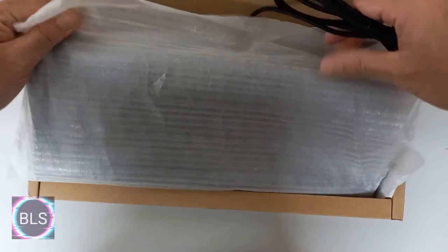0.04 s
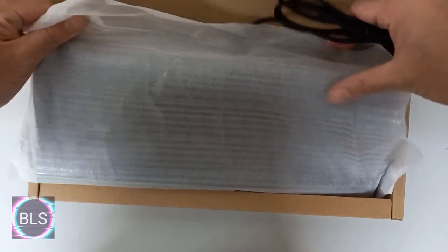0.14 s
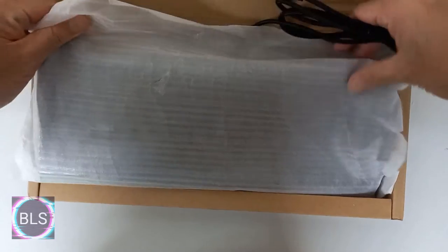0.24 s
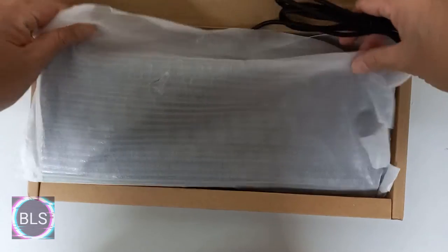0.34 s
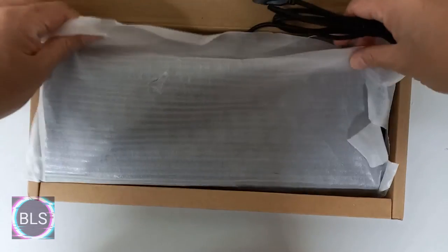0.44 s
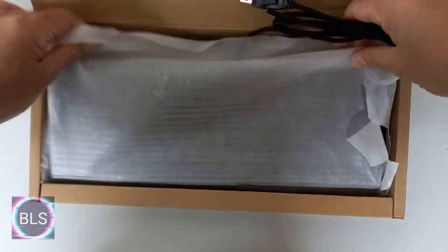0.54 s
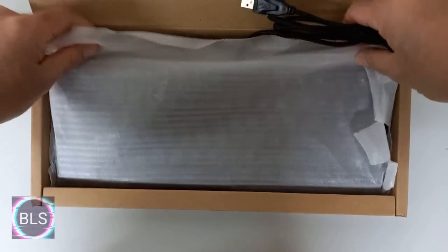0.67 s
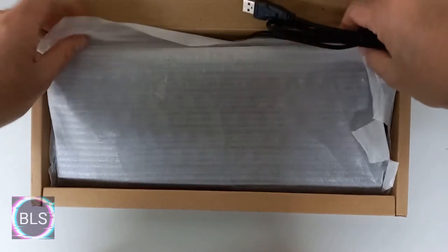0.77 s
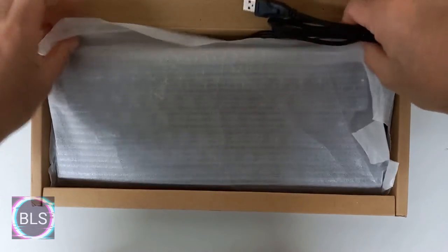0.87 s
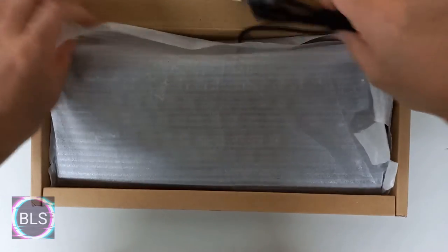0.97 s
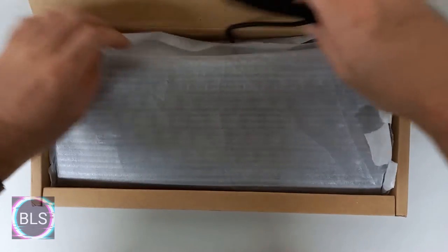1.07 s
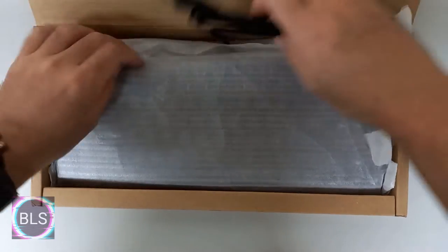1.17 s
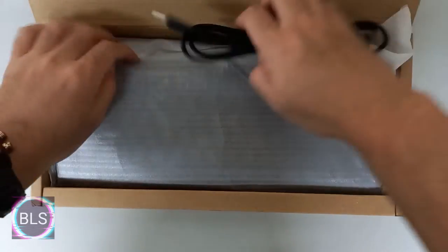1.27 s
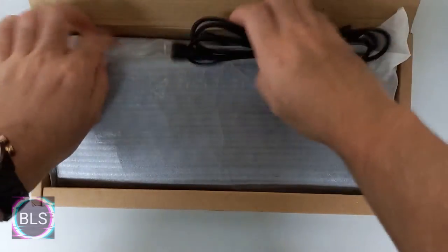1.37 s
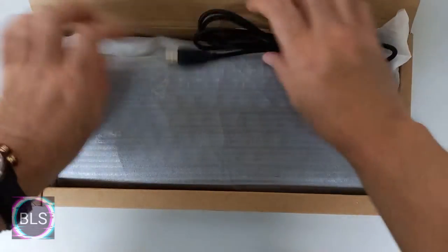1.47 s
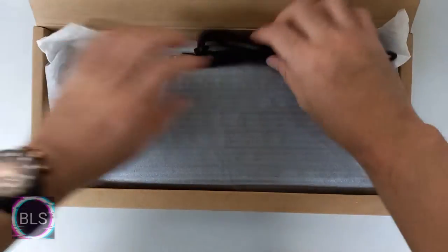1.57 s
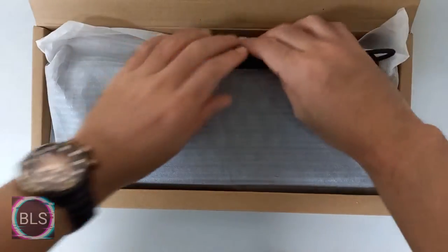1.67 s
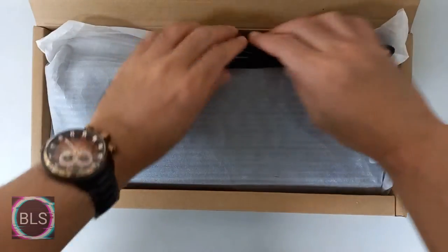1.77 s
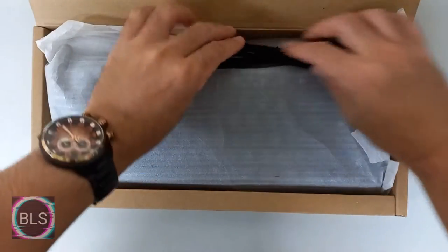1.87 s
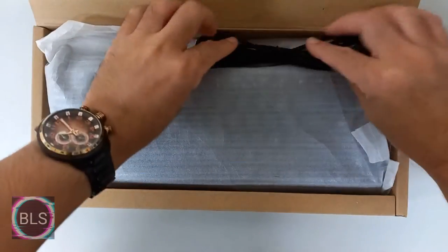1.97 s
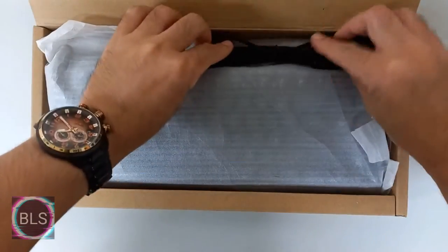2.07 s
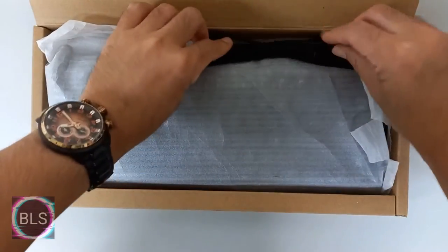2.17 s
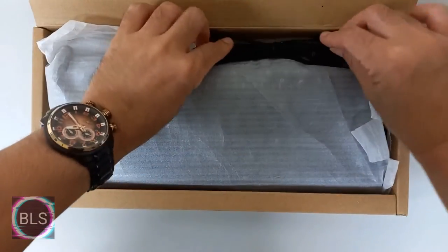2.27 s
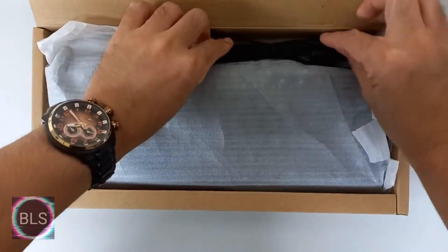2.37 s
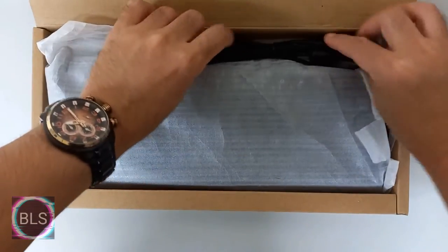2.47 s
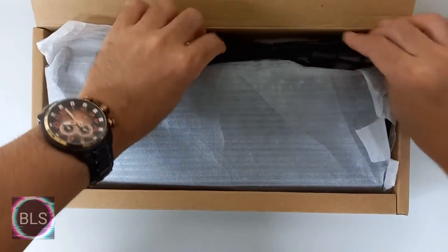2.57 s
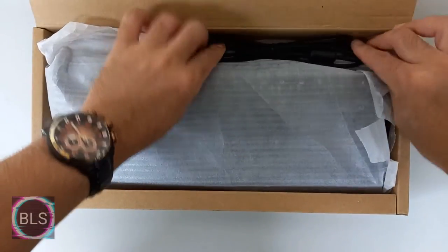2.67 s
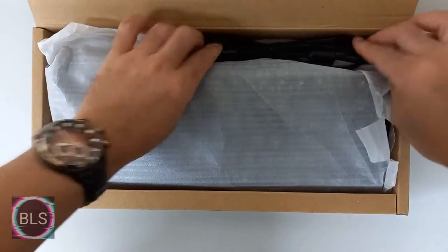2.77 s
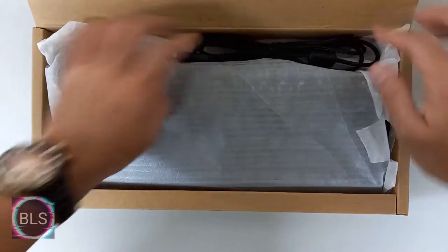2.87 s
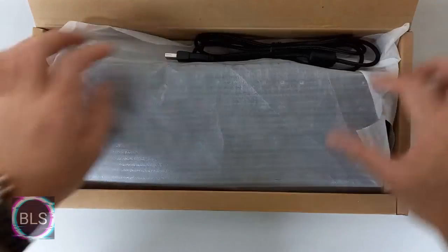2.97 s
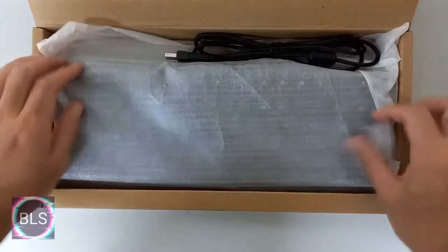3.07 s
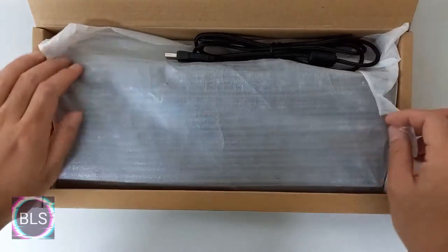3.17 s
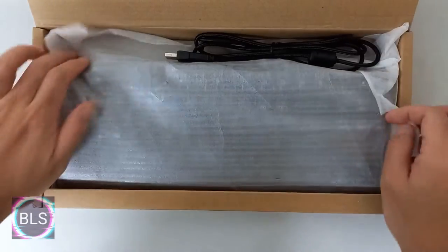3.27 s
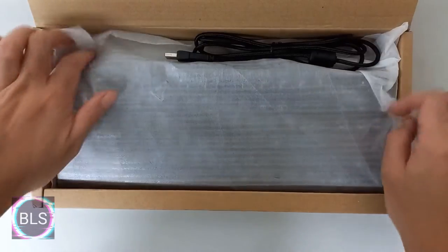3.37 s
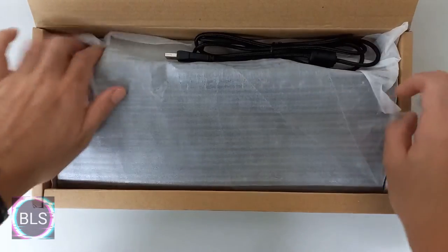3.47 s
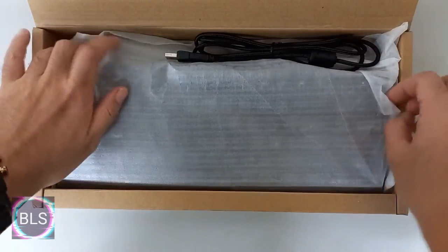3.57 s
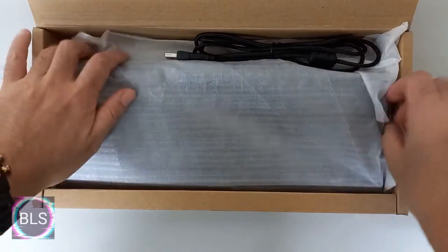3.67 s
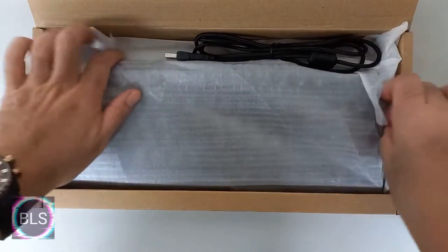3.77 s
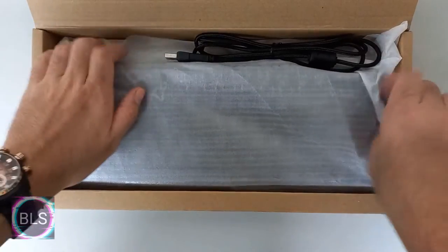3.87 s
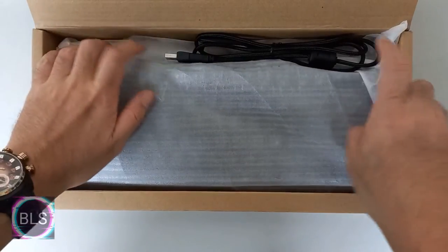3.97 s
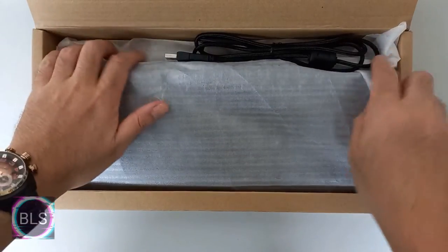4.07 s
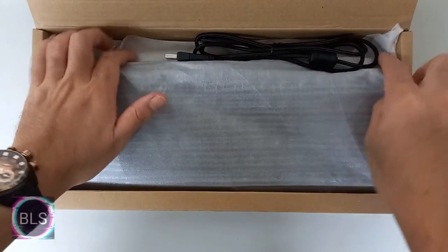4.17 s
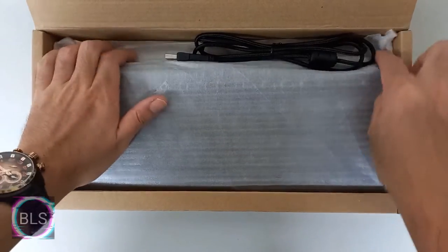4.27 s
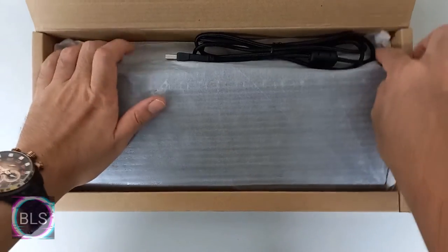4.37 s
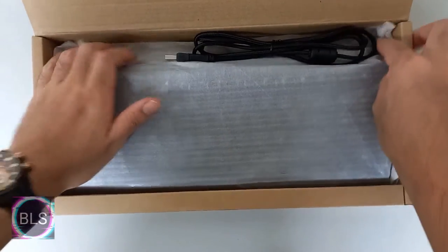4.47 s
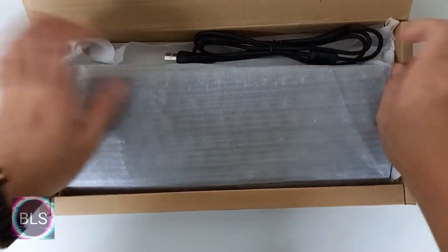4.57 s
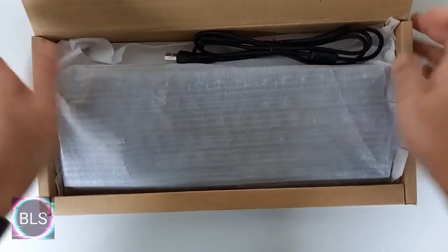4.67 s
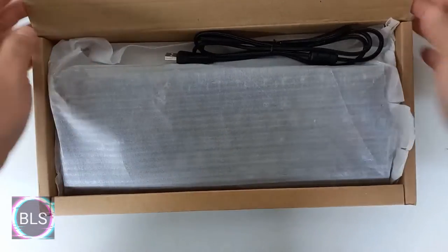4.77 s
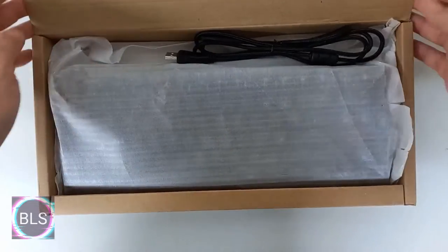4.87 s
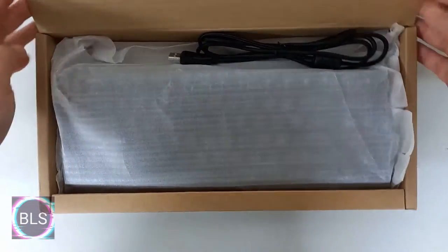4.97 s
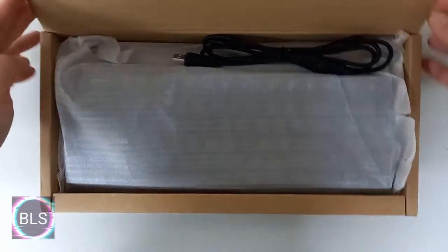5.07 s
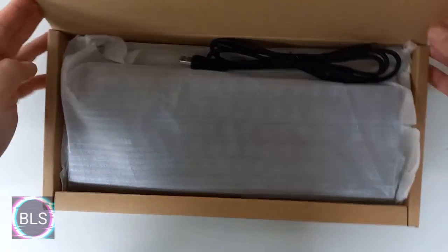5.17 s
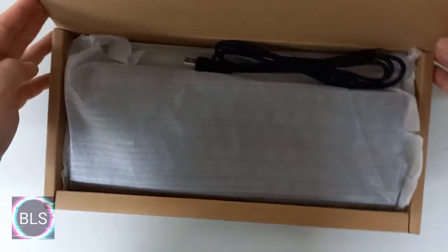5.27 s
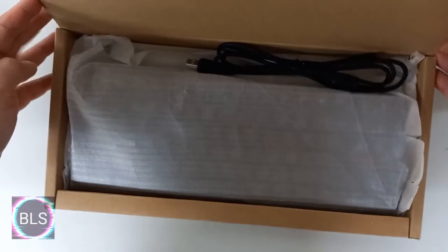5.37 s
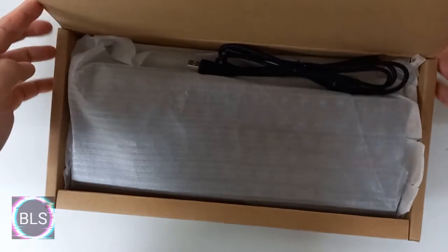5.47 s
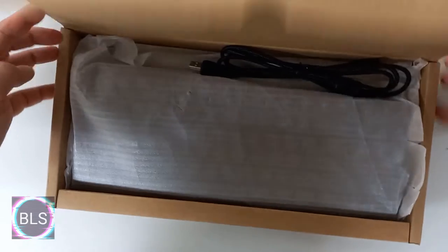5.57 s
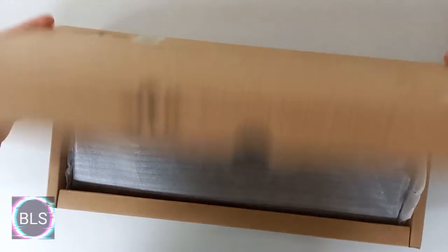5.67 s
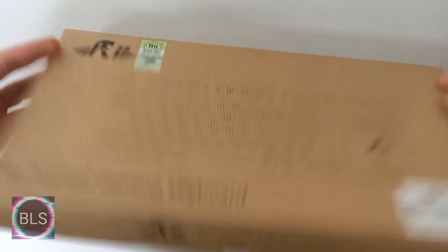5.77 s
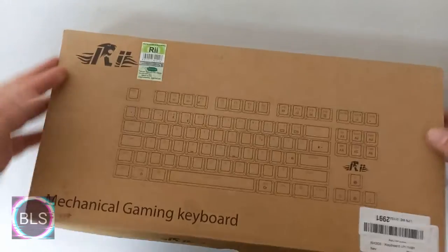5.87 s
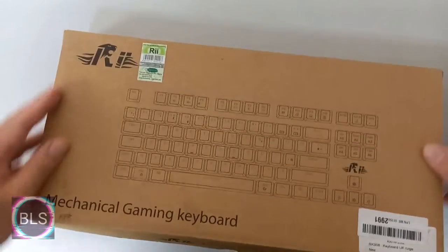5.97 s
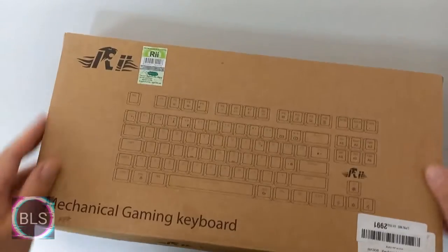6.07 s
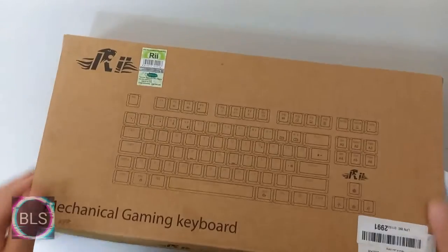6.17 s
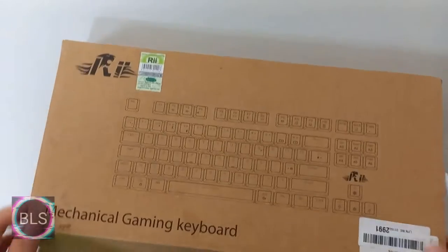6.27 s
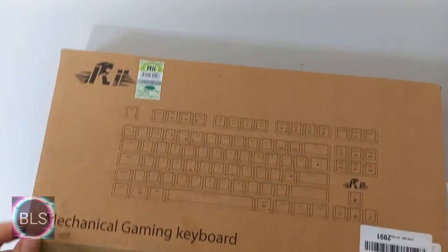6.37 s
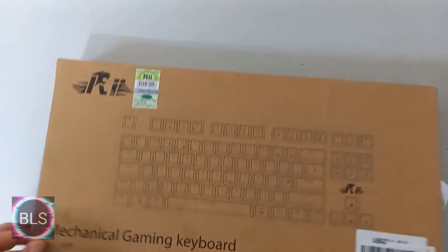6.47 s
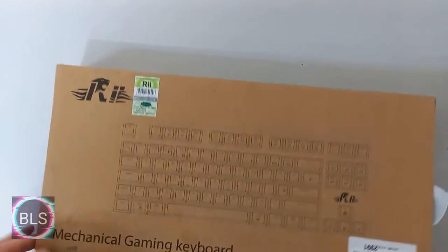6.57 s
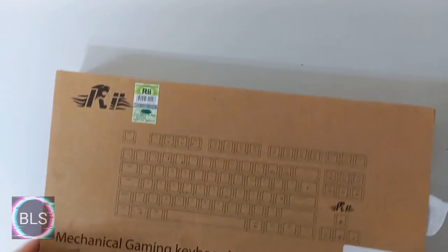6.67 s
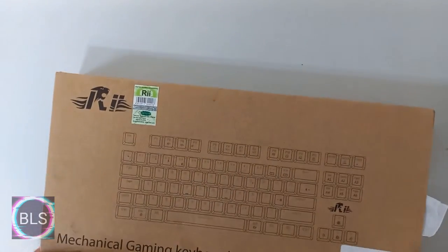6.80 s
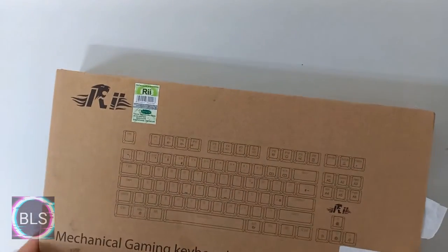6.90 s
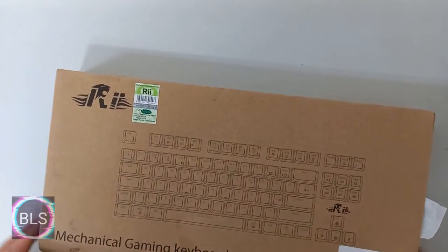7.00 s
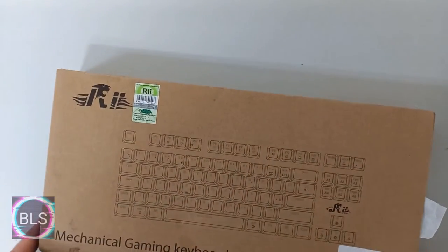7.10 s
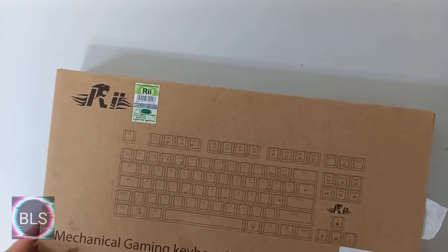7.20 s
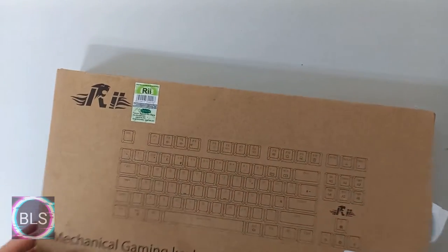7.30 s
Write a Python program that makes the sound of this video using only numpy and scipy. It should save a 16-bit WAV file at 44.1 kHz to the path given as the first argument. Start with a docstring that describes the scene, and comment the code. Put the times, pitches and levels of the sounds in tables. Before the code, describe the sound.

Very close to the microphone in a small, dull room, hands tuck foam wrap and a cable into a cardboard box. Rough scuffs and hollow knocks cluster early, then softer crumpling with crisp foam snaps. After a near-quiet pause the lid slams, loud and boomy through the table, followed by a small rattle, light scrapes and slight bumps over faint low room noise.

```python
"""On a table top, close to a camera's microphone, hands tuck foam wrap and a cable into a cardboard box.
Then the lid is shut. Scuffs and knocks ring the cardboard modes; pushes and thuds ring the table top.
The foam hisses and crumples as clumped stick-slip noise, and snaps in bright ticks with hollow pops.
A short, dull room tail and a faint steady noise lie behind; the treble is wide, the bass is central."""
import sys
import numpy as np
from scipy import signal
from scipy.fft import rfft, irfft, next_fast_len
from scipy.io import wavfile
from scipy.ndimage import uniform_filter1d

SR = 44100
rng = np.random.default_rng(int(sys.argv[2]) if len(sys.argv) > 2 else 0)


def put_to_file(sound):
    """Save the sound as 16-bit audio at rate SR, in the file named by the first command-line argument."""
    columns = np.atleast_2d(sound).T  # one column per channel
    safe = np.clip(columns, -1, 1)
    whole_steps = np.round(safe * 32767)
    wavfile.write(sys.argv[1], SR, whole_steps.astype(np.int16))


N = 323694  # samples


def amp(db):
    """Decibels to amplitude."""
    return 10 ** (np.asarray(db) / 20)


def evened(x):
    """Scales each channel to an RMS of 1."""
    return x / np.sqrt(np.mean(x ** 2, -1, keepdims=True) + 1e-20)


def add(mix, start_s, sound):
    """Adds a sound to the mix, cut off at the end."""
    part = mix[:, round(start_s * SR):][:, :sound.shape[1]]
    part += sound[:, :part.shape[1]]


def coloured(x, points):
    """Filters by a spectrum given on a log-frequency axis."""
    size = next_fast_len(x.shape[-1] + 4096)
    hz, db = np.transpose(points)
    bins_hz = np.fft.rfftfreq(size, 1 / SR)
    gain = amp(np.interp(np.log(bins_hz + 1), np.log(hz + 1), db))
    return irfft(rfft(x, size) * gain, size)[..., :x.shape[-1]]


def burst(colour, rise_s, t60_s):
    """A puff of coloured noise that builds fast and decays exponentially."""
    t = np.arange(3000) / SR
    noise = evened(coloured(rng.standard_normal((2, len(t))), colour))
    return (1 - np.exp(-t / rise_s)) * amp(-60 * t / t60_s) * noise


def slips(per_s, spread_db, clump_db, clump_s, hiss):
    """Stick-slip drive for mid and side: clicks of very unequal size over hiss, both swelling in clumps."""
    width = int(clump_s * SR)
    clumps = evened(uniform_filter1d(uniform_filter1d(rng.standard_normal(N), width), width))
    size = amp(spread_db * np.minimum(rng.exponential(1, N), 3.2))
    clicks = size * (rng.random(N) < per_s / SR)
    clicks = signal.lfilter([1], [1, -.97], clicks)  # each slip fades with a time constant under 1 ms
    return amp(clump_db * clumps) * (evened(clicks) + hiss) * rng.standard_normal((2, N))


def ring(modes, db, length_s, rise_s, damping=1, neighbour=-1.098):
    """Decaying modes of one blow, each neighbour times the last; the side channel has other phases."""
    hz, mode_db, t60_s = np.transpose(modes)[..., None]
    t = np.arange(int(length_s * SR)) / SR
    phase = rng.random((len(modes), 1))  # turns
    hz = hz * (1 + .008 * rng.standard_normal(hz.shape))
    weight = neighbour ** np.arange(len(modes))[:, None]
    level = amp(mode_db + db - 60 * damping * t / t60_s)
    envelope = weight * level * (1 - np.exp(-t / rise_s))
    return np.array([(envelope * np.sin(2 * np.pi * (hz * t + turn))).sum(0) for turn in (0, phase)])


def driven(modes, db, drive, damping, shift, count):
    """A lasting drive wanders over patches of a body; each shifts and weights the modes in its own way."""
    out, t = np.zeros((2, N)), np.arange(N) / SR
    turns_s = np.cumsum(rng.uniform(.5, 1.5, 80)) * .12 - 1  # the touch moves on several times a second
    patch = rng.integers(0, count, len(turns_s))
    for k in range(count):
        bend, tilt = rng.standard_normal((2, len(modes), 1))
        bent = np.array(modes)
        bent[:, :1] *= 1 + shift * bend
        body = ring(bent, db + 70 * shift * tilt, .35, 0.0014, damping)
        body = body / np.linalg.norm(body, axis=1)[:, None]
        share = np.sqrt(np.interp(t, turns_s, patch == k))
        out += signal.oaconvolve(share * drive, body, axes=1)[:, :N]
    return out


# Strokes of the hands over foam, cable and box, close to the microphone; layer levels before the body
# or colour: start_s, length_s, scuff_db, crumple_db, hiss_db
HAND_STROKES = [(-.02, 0.068, -31.5, -52, -45.5), (0.24, 0.077, -42.5, -75, -54.5),
                (0.5, 0.071, -40.5, -68, -67), (0.665, 0.087, -41.5, -53, -50.5),
                (1.135, 0.054, -34, -37.5, -55), (1.43, 0.16, -45, -50.5, -49.5),
                (1.715, 0.073, -43, -43.5, -49.5), (1.895, 0.12, -44, -48, -55),
                (2.14, 0.15, -42, -51, -59.5), (2.33, 0.08, -46.5, -47, -54.5),
                (2.45, 0.16, -36.5, -41, -50), (2.63, 0.18, -48.5, -58, -54.5),
                (2.78, 0.045, -53, -43, -47.5), (2.91, 0.095, -47, -45, -48.5),
                (3.19, 0.12, -55, -57, -53.5), (3.42, 0.25, -73, -67, -53.5),
                (3.75, 0.16, -50.5, -53, -47.5), (3.945, 0.12, -64, -68, -49.5),
                (4.24, 0.095, -68, -61, -47), (4.39, 0.1, -59, -56, -51.5), (4.58, 0.16, -59, -57, -49.5)]
# Scrapes and rattles of the box and lid, short and long, including the rattle as the lid lands:
# start_s, length_s, scuff_db, scrape_db, hiss_db
BOX_SCRAPES = [(5.18, 0.31, -70, -62.5, -67), (5.86, 0.24, -67, -57.5, -58.5),
               (6.0, 0.077, -45.5, -50, -58), (6.12, 0.28, -77, -82, -55), (6.29, 0.22, -57.5, -54.5, -81),
               (6.735, 0.16, -53, -54, -58.5), (7.09, 0.055, -54, -56.5, -81)]
# Fading after letting go: scuff_db_per_s, crumple_db_per_s, hiss_db_per_s
STROKE_FADE = (337, 430, 920)
# Fading after a scrape or rattle: scuff_db_per_s, scrape_db_per_s, hiss_db_per_s
SCRAPE_FADE = (78, 390, 940)
# Foam settling under the resting hands, before the layer offset: time_s, level_db
RESTING_HANDS = [(0, -58), (1.4, -55), (1.87, -65), (2.75, -51.5), (3.14, -74), (3.36, -57), (4.7, -56.5),
                 (4.87, -85), (4.95, -68), (5.8, -73.5), (6.1, -57.5), (7.34, -69.5)]
# Offset of each layer under the resting hands: scuff_db, crumple_db, hiss_db
REST_OFFSET = (0.51, -1.2, 0)
# Part of its length that a stroke or scrape takes to build: scuff_share, crumple_share, hiss_share
RISE_SHARE = (0.33, 0.24, 0.29)


def contact(layer):
    """Gain of a friction layer (0 scuff, 1 crumple, 2 hiss): strokes build, hold and fade over rest."""
    t = np.arange(0, N, 32) / SR
    power = amp(np.interp(t, *np.transpose(RESTING_HANDS)) + REST_OFFSET[layer]) ** 2
    for rows, fade in [(HAND_STROKES, STROKE_FADE), (BOX_SCRAPES, SCRAPE_FADE)]:
        for start_s, length_s, *db in rows:
            rise = np.clip((t - start_s) / (RISE_SHARE[layer] * length_s), 0, 1)
            after_s = np.maximum(t - start_s - length_s, 0)
            power += (rise * amp(db[layer] - fade[layer] * after_s)) ** 2
    return np.interp(np.arange(N) / SR, t, np.sqrt(power))


# Modes of the cardboard box, before scatter and added damping: pitch_hz, level_db, t60_s
BOX_MODES = [(236.3, -11, 0.15), (368.6, -2, 0.12), (403.5, -0.5, 0.17), (493.5, -5, 0.13), (722, 1, 0.049),
             (830, 6.5, 0.028), (1161, 7, 0.016), (1301, 4.5, 0.019), (1621, -1, 0.034), (2264, 21, 0.0073)]


def lean(spot_hz, db_at_one_octave):
    """Box mode weights (dB) around the pitch a touched spot favours, falling with octaves squared."""
    return -db_at_one_octave * np.log2(np.array(BOX_MODES)[:, :1] / spot_hz) ** 2


def scuffing():
    """Rubbing on the cardboard: stick-slip rings the lower box modes, well damped."""
    drive = contact(0) * evened(slips(220, 4.4, 2.4, 0.0092, 0.79))
    return driven(BOX_MODES, lean(403, 4.2), drive, 3.0, 0.062, count=4)


# Modes of the table top, before scatter and damping: pitch_hz, level_db, t60_s
TABLE_MODES = [(60, -13, 0.3), (79, 0, 0.4), (104, 1, 0.14), (154, -4, 0.3)]


def pushing():
    """Scuffs shake the table: slower stick-slip under the same strokes rings its modes."""
    drive = contact(0) * evened(slips(110, 5.7, 1.0, 0.016, 0.71))
    return amp(-8.0) * driven(TABLE_MODES, 0, drive, 1.1, 0, count=1)


# Spectrum of crumpling, relative: pitch_hz, level_db
CRUMPLE_COLOUR = [(500, -5.5), (1200, 8), (3000, -9), (6000, -32)]


def crushing():
    """Gritty foam, then the smooth scrape of the box; both also ring the upper modes of the cardboard."""
    smooth = 2.0 + 2.4 * (np.arange(N) > 4.8 * SR)  # more hiss between the clicks after 4.8 s
    drive = contact(1) * slips(300, 7.1, 2.3, 0.013, smooth) / (1 + smooth)
    cardboard = driven(BOX_MODES, lean(830, 10.4), drive, 1.14, 0.047, count=4)
    return amp(-4.5) * cardboard + amp(6.5) * coloured(drive, CRUMPLE_COLOUR)


# Spectrum of foam through the microphone, which peaks near 7 kHz, relative: pitch_hz, level_db
HISS_COLOUR = [(1470, -2), (2720, -2), (6820, -1.5), (8080, -10.5), (10000, -7), (13600, -7), (15800, -13)]


def sliding():
    """Hiss of foam under the fingers and of the box on the table: coloured stick-slip noise."""
    return contact(2) * evened(coloured(slips(270, 2.5, 2.04, 0.02, 4.0), HISS_COLOUR))


# Spectrum of the faint background, relative: pitch_hz, level_db
QUIET_COLOUR = [(86, 4), (735, -9), (1840, -40), (6650, -28), (14200, -55)]


def quiet():
    """Faint steady noise, mostly bass."""
    return amp(-61) * evened(coloured(rng.standard_normal((2, N)), QUIET_COLOUR))


# Thuds on the table top, pitch favoured by the pushed spot: start_s, peak_db, pitch_hz
TABLE_THUDS = [(0.04, -54, 155), (0.742, -32, 65), (1.921, -39, 85), (2.558, -31, 101), (2.812, -33, 75),
               (3.773, -38, 75), (6.001, -12.5, 103.6), (6.815, -35.5, 113), (6.915, -36, 140)]


def thuds():
    """Soft blows ring the table top; leaning hands damp the weak ones more."""
    out = np.zeros((2, N))
    for start_s, peak_db, spot_hz in TABLE_THUDS:
        weights_db = -12 * np.log2(np.array(TABLE_MODES)[:, :1] / spot_hz) ** 2
        damping = amp(-.15 * (peak_db + 20.0))
        blow = ring(TABLE_MODES, weights_db, 0.65, 0.0031, damping, 1.0)
        add(out, start_s, amp(peak_db) * blow / abs(blow[0]).max())
    return out


# Knocks on the cardboard, peak of the ringing, pitch favoured by the struck spot: start_s, peak_db, pitch_hz
BOX_KNOCKS = [(0.064, -32, 430), (0.241, -35.5, 395), (0.284, -29, 410), (0.542, -32, 395),
              (0.679, -30, 375), (0.901, -31, 450), (0.994, -30, 428), (1.062, -30, 420), (1.145, -18, 480),
              (1.443, -21, 375), (1.4915, -15.5, 490), (1.508, -25, 390), (1.529, -18.5, 497),
              (1.623, -23.5, 507), (1.719, -30, 400), (1.729, -20.5, 500), (1.755, -26.5, 484),
              (1.788, -29.5, 810), (1.912, -29, 388), (2.216, -24, 418), (2.252, -23.5, 405),
              (2.481, -29, 780), (2.504, -26, 840), (2.548, -19, 365), (2.601, -20, 416), (2.789, -23, 583),
              (2.985, -21.5, 583), (6.573, -34, 520), (6.812, -34, 390)]


def knocks():
    """Each blow cracks and starts all box modes together, favouring those near its pitch."""
    out = np.zeros((2, N))
    for start_s, peak_db, spot_hz in BOX_KNOCKS:
        weights_db = lean(spot_hz, 11.5) + 6.3 * rng.standard_normal((len(BOX_MODES), 1))
        blow = ring(BOX_MODES, weights_db, .25, 0.00056, 1.94, 1)
        add(out, start_s, amp(peak_db) * blow / abs(blow[0]).max())
        add(out, start_s, amp(peak_db - 17) * burst(CRUMPLE_COLOUR, 0.000077, 0.051))
    return out


# Snaps of the foam, a bright tick (peak) and a hollow pop (early RMS): start_s, tick_db, tick_hz, pop_db
FOAM_SNAPS = [(0.9184, -39, 3000, -47), (1.5558, -33.5, 3000, -36), (1.5942, -25.5, 3000, -32),
              (1.6087, -32.5, 7000, -36), (2.355, -33.5, 11400, -41), (2.808, -33, 9000, -45),
              (2.9854, -29, 4900, -37), (3.2756, -31, 9200, -59), (3.2854, -37, 3000, -37.5),
              (3.4915, -41.5, 3650, -46), (3.692, -34.5, 4750, -46), (3.7578, -37, 6460, -47),
              (3.774, -23.5, 10200, -35), (3.8072, -35, 4340, -41), (3.8478, -25.5, 4860, -31),
              (3.9519, -29, 9800, -62), (4.0306, -33, 6900, -39.5), (4.1004, -38, 3640, -44.5),
              (4.2591, -30, 5800, -34), (4.4, -30.5, 6800, -47.5), (4.622, -43, 6990, -39),
              (6.572, -35.5, 5070, -42)]


def snaps():
    """A crack with weaker ones behind it: a tick of its own colour and a pop in the upper box modes."""
    out = np.zeros((2, N))
    for start_s, tick_db, tick_hz, pop_db in FOAM_SNAPS:
        cracks = np.zeros((1, 500))
        late_s = np.arange(4) * rng.uniform(0, .003, 4)
        cracks[0, (late_s * SR).astype(int)] = amp(-1200 * late_s)
        colour = [(hz, db - 5 * np.log2(hz / tick_hz) ** 2) for hz, db in HISS_COLOUR]
        tick = signal.oaconvolve(burst(colour, 0.00017, 0.03), cracks, axes=1)
        add(out, start_s, amp(tick_db) * tick / abs(tick[0]).max())
        weights_db = lean(1250, 18) + 3 * rng.standard_normal((len(BOX_MODES), 1))
        pop = ring(BOX_MODES, weights_db, .1, 0.00015, 1.3)
        pop = signal.oaconvolve(pop, cracks, axes=1)
        add(out, start_s, amp(pop_db) * pop / pop[0, :400].std())
    return out


def slam():
    """The lid lands edge after edge within a few milliseconds, ringing the box, and slaps."""
    land_s, ring_peak_db = 5.995, -10
    out = np.zeros((2, N))
    for late_s, edge_db in [(0, -11.5), (.003, -2), (.009, -3.5)]:
        blow = ring(BOX_MODES, lean(620, 8), .3, 0.0013)
        add(out, land_s + late_s, amp(edge_db) * blow / abs(blow[0]).max())
    out *= amp(ring_peak_db) / abs(out[0]).max()
    add(out, land_s, amp(ring_peak_db - 4.0) * burst(CRUMPLE_COLOUR, 0.00086, 0.044))
    return out


# The box edge scrapes thinly, one row: start_s, length_s, pitch_hz, width_hz, level_db
EDGE_SQUEAK = (6.81, .1, 3300, 300, -59)


def squeak():
    """Narrow noise that swells and fades."""
    start_s, length_s, hz, width_hz, db = EDGE_SQUEAK
    noise = rng.standard_normal((2, N))
    tone = evened(coloured(noise, [(hz - width_hz, -40), (hz, 0), (hz + width_hz, -40)]))
    progress = np.clip((np.arange(N) / SR - start_s) / length_s, 0, 1)
    return amp(db) * tone * np.sin(np.pi * progress)


def room(x, t60_s=0.25):
    """Sparse taps of random sign that die away, duller than the direct sound."""
    t = np.arange(int(.4 * SR)) / SR
    taps = rng.choice([-1., 1.], (2, len(t))) * (rng.random((2, len(t))) < .05)
    taps = taps * amp(-60 * t / t60_s) * (t > .004)
    taps = coloured(taps, [(100, 1.0), (500, -8), (12000, -9.5)])
    return signal.oaconvolve(x, taps / np.linalg.norm(taps[0]), axes=1)[:, :N]


# Gain of the side channel at the microphone's two ports: pitch_hz, level_db
SIDE_WIDTH = [(60, -15), (300, -21), (600, -10), (1400, -2), (5000, 0)]


def scene():
    """Mixes the layers as mid and side, adds the room, and turns them into left and right."""
    near = scuffing() + crushing() + sliding() + knocks() + snaps() + squeak()
    lid, bumps = slam(), thuds()
    reflected = room(amp(-11.0) * near + amp(-7.5) * lid + amp(-12.5) * bumps)
    mid, side = near + lid + reflected + pushing() + bumps + quiet()
    side = coloured(side, SIDE_WIDTH)  # bass arrives alike at both ports, treble does not
    return np.array([mid + side, mid - side])


def record(dry):
    """The microphone drops the deepest bass; then the band limit."""
    low_cut_hz, high_cut_hz = 42, 15800
    thin = signal.sosfilt(signal.butter(4, low_cut_hz, "high", fs=SR, output="sos"), dry)
    band = signal.firwin(511, high_cut_hz, window=("kaiser", 9), fs=SR)
    return signal.oaconvolve(thin, band[None], "same")


dry = scene()
out = record(dry)
put_to_file(out)
```